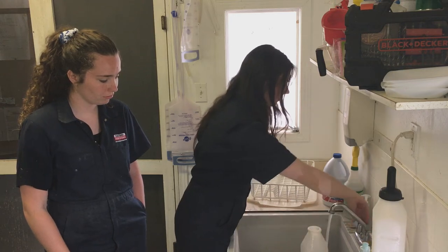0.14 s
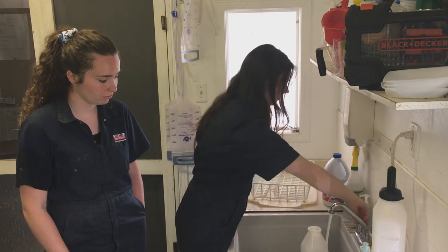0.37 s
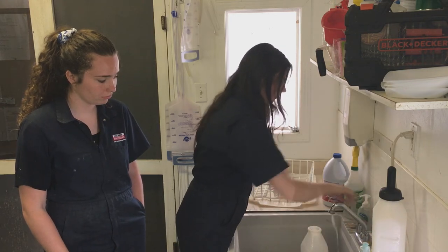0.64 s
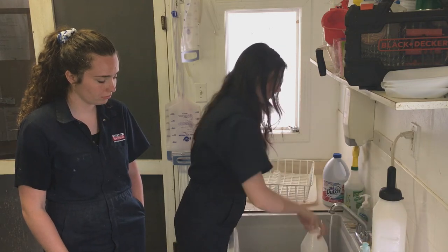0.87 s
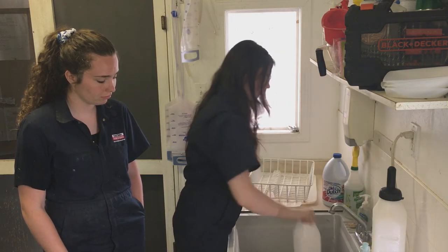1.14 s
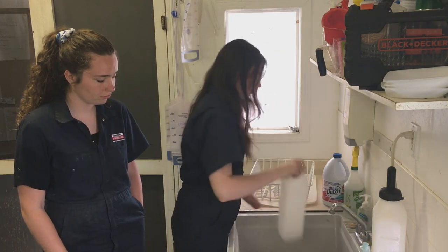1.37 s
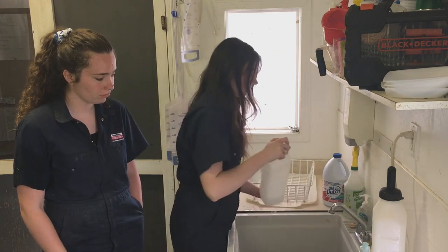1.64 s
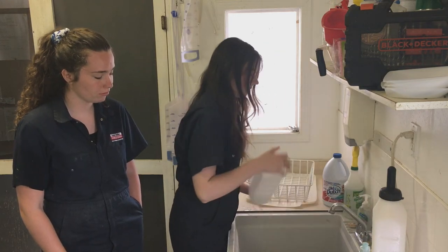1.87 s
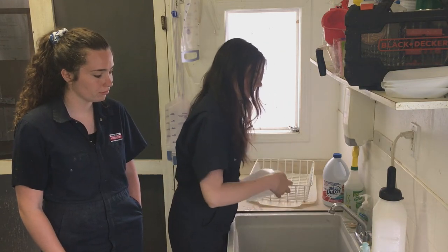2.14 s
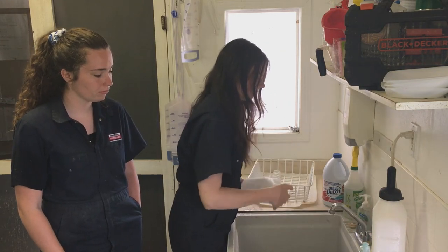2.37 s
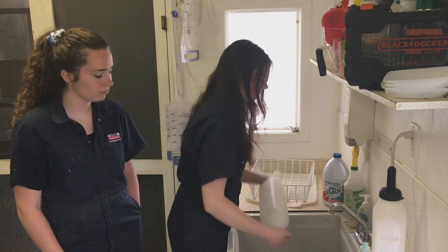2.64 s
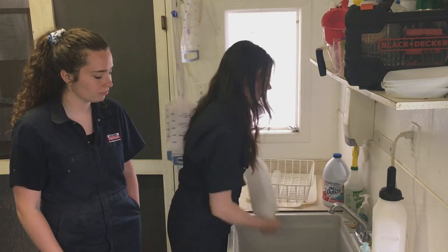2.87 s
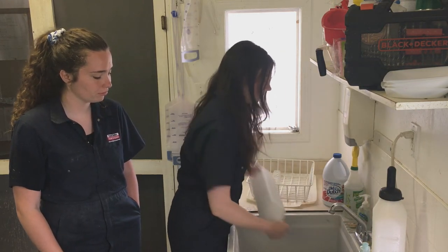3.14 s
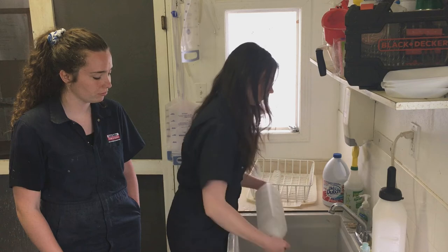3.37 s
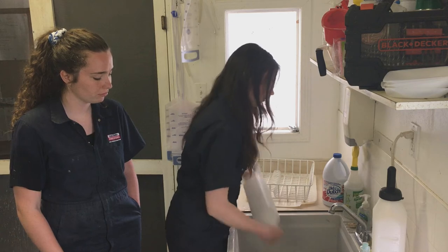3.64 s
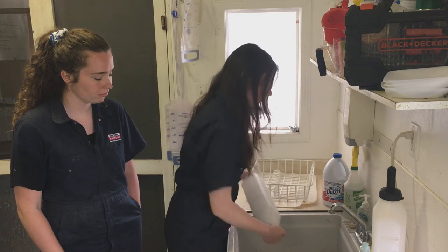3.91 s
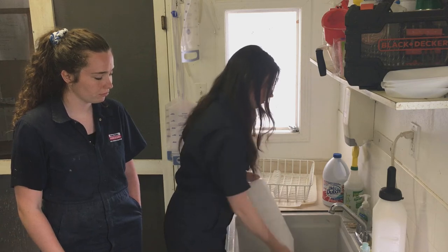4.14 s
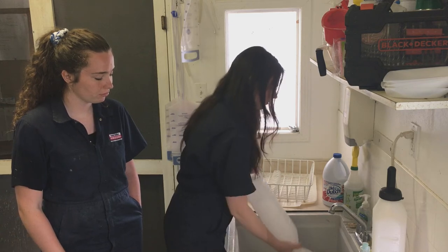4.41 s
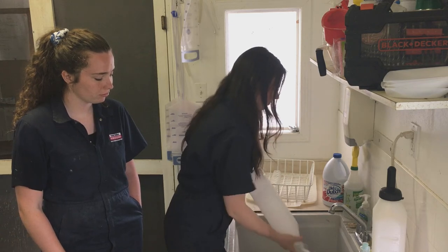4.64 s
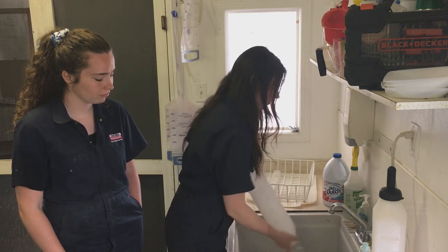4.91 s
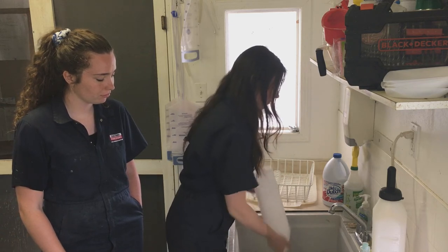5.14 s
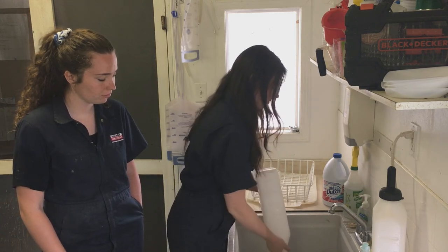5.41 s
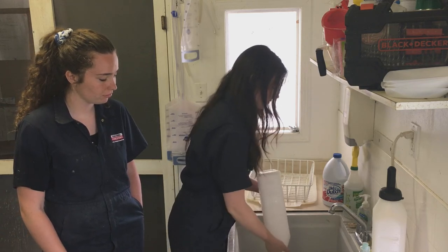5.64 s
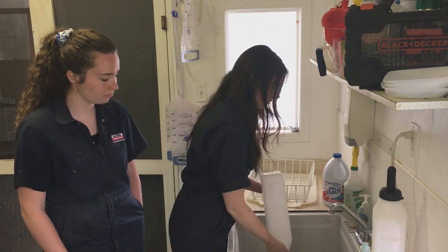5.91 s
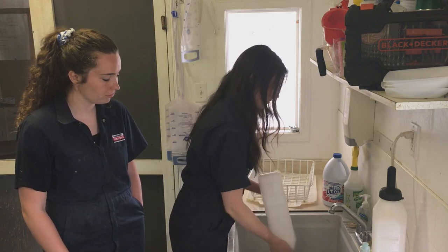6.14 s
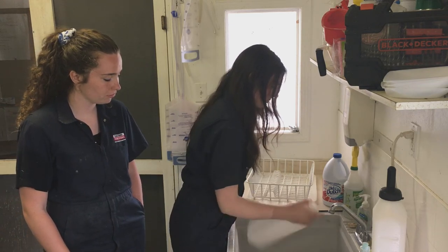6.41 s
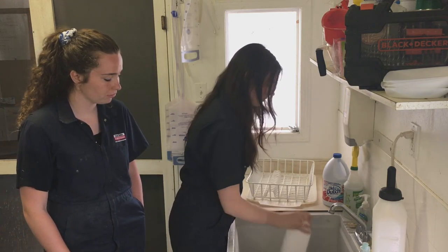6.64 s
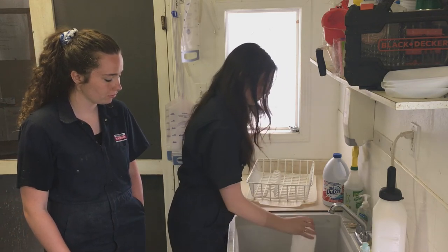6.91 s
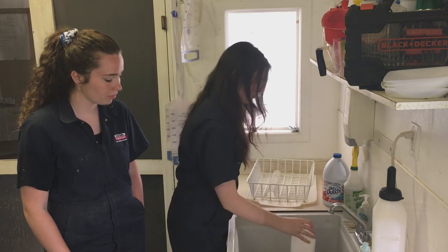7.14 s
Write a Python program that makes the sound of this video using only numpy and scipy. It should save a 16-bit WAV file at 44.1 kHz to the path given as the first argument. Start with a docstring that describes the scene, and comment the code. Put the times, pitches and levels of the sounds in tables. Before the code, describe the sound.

A small, hard, briefly reverberant utility room with a low, steady hum of distant machines; the microphone is close. From 0 s a tap jet hisses into a plastic bottle, whose air hums. Between 0.3 and 0.55 s the closing valve gives thin, very high whistles, and the flow dies by about 0.85 s. Bright drops, small ticks, dull bumps and slosh follow around 1 to 1.5 s, then near quiet with a faint slosh at 2.05 s. At 2.75 s water gurgles from the upended bottle, shaken in quick surges from 2.9 to 3.9 s. A heavy slap lands at 4.0 s; freer gushing with deep glugs drums on the basin until a sharp splash at 4.93 s. Drips and ticks thin out from 5.1 to 6.35 s. A bright, loud, rattling hollow knock hits at 6.39 s, a duller one at 6.78 s, and a soft one at 7.05 s.

```python
"""A tap hisses into a humming plastic bottle at a utility sink in a small hard room; its valve whistles shut.
The bottle is lifted, upended and shaken empty: water spatters, gurgles and drums on the basin.
Last drops fall, then the bottle knocks three times on the basin.
Water is shaped noise with wandering resonances, drops and bubbles are rung bursts,
knocks ring basin modes; feedback delays make the room."""
import sys
import numpy as np
from scipy import signal
from scipy.fft import rfft, irfft, next_fast_len
from scipy.io import wavfile

SR = 44100
rng = np.random.default_rng(int(sys.argv[2]) if len(sys.argv) > 2 else 0)


def transcribe(u):
    """Save the signal u as a 16-bit wav file named by the first command-line argument.

    u: samples, shape (n,) or (channels, n), limited to [-1, 1]; the rate is SR.
    q: integer samples, one column per channel.
    """
    v = np.clip(np.atleast_2d(u).T, -1, 1)
    q = np.round(v * 32767).astype(np.int16)
    wavfile.write(sys.argv[1], SR, q)


def ratio_of_db(decibels):
    """Turn decibels (scalar or array-like) into linear amplitude factors; 0 dB maps to 1."""
    return 10 ** (np.asarray(decibels, float) / 20)


N = 321048
TIME = np.arange(N) / SR


def rms_one(x):
    """Scale to unit rms."""
    return x / np.sqrt(np.mean(x ** 2) + 1e-20)


def in_time(rows):
    """Columns of a curve table, one value per sample."""
    s, *columns = np.transpose(rows)
    return [np.interp(TIME, s, column) for column in columns]


def lasting(rows):
    """Gate: one while a curve table lasts, zero outside."""
    return (TIME >= rows[0][0]) & (TIME <= rows[-1][0])


def at_hz(points, hz):
    """Read a spectrum table on a log frequency axis."""
    table_hz, values = np.array(points).T
    return np.interp(np.log(hz), np.log(table_hz), values)


def filtered(x, order, edge_hz, kind):
    """Butterworth filter."""
    return signal.sosfilt(signal.butter(order, edge_hz, kind, fs=SR, output="sos"), x)


def drift(pole_hz):
    """Slow random curve of spread 1: noise at SR / 20 through two equal poles, interpolated."""
    r = np.exp(-2 * np.pi * pole_hz * 20 / SR)
    settle = 3000
    noise = rng.standard_normal(N // 20 + settle + 2)
    slow = signal.lfilter([1], [1, -2 * r, r * r], noise)[settle:]
    return np.interp(np.arange(N) / 20, np.arange(len(slow)), rms_one(slow))


def narrow_noise(hz, pole_hz):
    """Resonance fed by turbulence: carrier of wandering height and phase, rms about 1."""
    phase = np.cumsum(2 * np.pi * hz / SR * np.ones(N))
    return drift(pole_hz) * np.cos(phase) + drift(pole_hz) * np.sin(phase)


def ring(clicks, hz, t60_s):
    """Two-pole resonator: a unit click starts a decaying sine of height 1."""
    r = ratio_of_db(-60 / (t60_s * SR))
    w = 2 * np.pi * hz / SR
    return signal.lfilter([0, np.sin(w)], [1, -2 * r * np.cos(w), r * r], clicks + 1e-18)


def dying(s, t60_s):
    """Envelope that starts at s and falls 60 dB in t60_s."""
    return (TIME >= s) * ratio_of_db(-60 * np.maximum(TIME - s, 0) / t60_s)


def rising(s, rise_ms):
    """Envelope that climbs to one from s, time constant rise_ms."""
    return 1 - np.exp(-1000 * np.maximum(TIME - s, 0) / rise_ms)


def bands(spectrum, sources):
    """Yield 0.4-octave bands (centre Hz, signal) at spectrum level; neighbours take unrelated sources."""
    edges = 24 * 2 ** np.arange(0, 9.7, 0.4)
    for k, (low, high) in enumerate(zip(edges, edges[1:])):
        hz = np.sqrt(low * high)
        if hz > spectrum[0][0]:
            yield hz, ratio_of_db(at_hz(spectrum, hz)) * filtered(sources[k % 2], 2, [low, high], "band")


def droplets(per_s, spread_db, smooth):
    """Two streams of random impacts of uneven size on a smooth hiss."""
    sizes = ratio_of_db(spread_db * np.minimum(rng.exponential(1, (2, N)), 5))
    sizes *= rng.choice([-1, 1], (2, N))
    born = rng.random((2, N)) < per_s / SR
    return rms_one(sizes * born) + smooth * rng.standard_normal((2, N))


def swells(rows, rise_ms, t60_s):
    """Low resonances swell, ring, and are stilled as bottle, hand or water closes on them."""
    stilled_t60_s = 0.0063
    out = np.zeros(N)
    for s, db, hz, free_ms in rows:
        since = np.maximum(TIME - s, 0)
        stilled = ratio_of_db(-60 * np.maximum(since - free_ms / 1000, 0) / stilled_t60_s)
        envelope = rising(s, rise_ms) * dying(s, t60_s) * stilled
        out += ratio_of_db(db) * envelope * np.sin(2 * np.pi * hz * since)
    return out


# tap jet, shut in two turns: t/s, hiss level/dB, air column level/dB
TAP_JET = [(0.0, -36, -32), (0.4, -36.5, -37), (0.45, -42.5, -37), (0.49, -41, -55), (0.64, -47, -70),
           (0.665, -38.5, -74.5), (0.72, -46, -75), (0.79, -56.5, -82), (0.86, -63, -78)]
# jet hiss spectrum: f/Hz, level per Hz/dB
TAP_SPECTRUM = [(180, -50), (300, -17), (342, -5), (411, -31), (756, -8), (922, -20.5), (1490, -8.5),
                (1700, -11), (4210, -7), (4880, -11), (5950, -6.5), (8420, -7.5), (15500, -19)]
# modes of the air in the filling bottle: f/Hz, drift pole/Hz, level/dB
AIR_COLUMN_MODES = [(1440, 133, -3), (3030, 77, -20.5), (5200, 320, -8)]


def tap_jet():
    """Jet hisses as flickering droplet noise; bottle air hums and the bottle floor drums with it."""
    sag_per_s = 0.12   # the hum sinks with the jet
    rumble_db, rumble_hz, rumble_pole_hz = -19, 150, 30.3
    hiss_db, column_db = in_time(TAP_JET)
    hiss = sum(ratio_of_db(1.9 * drift(9)) * band for _, band in bands(TAP_SPECTRUM, droplets(4000, 2.9, 0.59)))
    column = sum(ratio_of_db(db) * narrow_noise(hz * (1 - sag_per_s * TIME), pole_hz)
                 for hz, pole_hz, db in AIR_COLUMN_MODES)
    rumble = ratio_of_db(rumble_db) * narrow_noise(rumble_hz, rumble_pole_hz)
    return lasting(TAP_JET) * (ratio_of_db(hiss_db) * rms_one(hiss) + ratio_of_db(column_db) * (column + rumble))


# background spectrum: f/Hz, level per Hz/dB
AIR_SPECTRUM = [(15, -61), (25, -20), (37, -25.5), (80, 0), (144, -5.5), (241, -7.5), (324, -15),
                (382, -12), (572, -10.5), (1220, -14.5), (1430, -25.5), (2150, -23), (3130, -30.5),
                (5520, -31), (15800, -37)]
# background left-right likeness: f/Hz, likeness (0-1)
AIR_STEREO = [(60, 1), (240, 0.93), (950, 0.86), (3770, 0.88), (15000, 0.91)]


def air():
    """Distant machines and traffic hum through the walls: stereo noise flickering band by band."""
    level_db = -53.5   # left channel, 300-1300 Hz
    out = 0
    for hz, (mid, side) in bands(AIR_SPECTRUM, rng.standard_normal((2, 2, N))):
        alike = np.clip(at_hz(AIR_STEREO, hz), 0, 1)
        flicker = ratio_of_db(3.24 * min(1, 500 / hz) * drift(11.0))
        stereo = np.sqrt(1 + alike) * mid + np.sqrt(1 - alike) * side * [[1], [-1]]
        out = out + flicker * stereo
    return ratio_of_db(level_db) * out / np.std(filtered(out[0], 4, [300, 1300], "band"))


# reverberation: f/Hz, t60/s
ROOM_DECAY = [(100, 0.38), (1000, 0.28), (5000, 0.4), (15000, 0.33)]
# echoes to the sides: f/Hz, level/dB
ROOM_SIDE_LEVEL = [(100, -24), (300, -9), (1000, -7.5), (5000, -10), (14000, -10.5)]


def room(x):
    """Feedback delays with frequency-dependent loss; one set in the middle, another to the sides."""
    middle_db = -4.5
    size = next_fast_len(N + SR)
    hz = np.maximum(np.arange(size // 2 + 1) * SR / size, 1)
    t60_s = at_hz(ROOM_DECAY, hz)
    spectrum = rfft(x, size)
    out = []
    lags_s = rng.uniform(0.009, 0.05, (2, 16))
    for lags, db in zip(lags_s, [middle_db, at_hz(ROOM_SIDE_LEVEL, hz)]):
        loops = [ratio_of_db(-60 * lag / t60_s) * np.exp(-2j * np.pi * hz * lag) for lag in lags]
        echo = sum((-1) ** k * loop / (1 - loop) for k, loop in enumerate(loops))
        echo = echo / np.sqrt(np.mean(np.abs(echo) ** 2))
        out.append(irfft(ratio_of_db(db) * spectrum * echo, size)[:N])
    middle, side = out
    return middle + side * [[1], [-1]]


# glides of the closing valve: start t/s, end t/s, start f/Hz, end f/Hz, level/dB
VALVE_WHISTLES = [(0.302, .358, 10000, 9960, -49.5), (0.303, 0.341, 12300, 12830, -34),
                  (.318, .342, 6340, 6480, -42), (0.348, 0.42, 11300, 11920, -31),
                  (.418, .5, 11800, 12150, -33), (0.416, 0.446, 12540, 12620, -18),
                  (.42, .488, 8715, 8740, -38), (.455, 0.464, 12550, 12630, -18),
                  (0.476, 0.482, 12640, 12640, -18), (0.488, 0.542, 12300, 12420, -36),
                  (.495, .56, 12700, 12700, -43), (.56, 0.674, 12500, 12620, -62)]


def whistles():
    """Closing valve whistles: gliding sines, randomly wavering in height and phase."""
    waver, waver_pole_hz = 0.3, 61
    rise_ms, t60_s = 3.3, 0.03
    wander = drift(waver_pole_hz) + 1j * drift(waver_pole_hz)
    out = np.zeros(N)
    for start, end, from_hz, to_hz, db in VALVE_WHISTLES:
        hz = np.interp(TIME, [start, end], [from_hz, to_hz])
        carrier = np.exp(1j * np.cumsum(2 * np.pi * hz / SR))
        held = rising(start, rise_ms) * np.where(TIME < end, 1, dying(end, t60_s))
        out += ratio_of_db(db) * held * np.imag(carrier * (np.sqrt(2) + waver * wander))
    return out


# single drops: t/s, peak level/dB, f/Hz, burst decay constant/ms
SINGLE_DROPS = [(0.521, -26, 3560, 3.2), (0.567, -22, 6000, 2.6), (0.988, -33, 4000, 5),
                (1.027, -25.5, 5960, 11), (1.065, -29, 10800, 5), (1.089, -15.5, 6960, 6.2),
                (1.09, -26.5, 3160, 10), (1.188, -23, 11400, 4), (1.3533, -28, 4080, 4),
                (1.445, -32.5, 10900, 5.6), (5.145, -29.5, 3000, 4.3), (5.201, -29.5, 2360, 21),
                (5.224, -32, 4420, 7), (5.419, -26.5, 8600, 5.5), (5.549, -37, 11100, 4),
                (5.694, -22, 3000, 12), (5.695, -24, 3900, 11), (5.7467, -30, 10500, 3.3),
                (5.838, -32, 7100, 4), (5.952, -37.5, 8740, 3.3), (6.055, -35.5, 6640, 5.8),
                (6.141, -32, 8800, 5.4), (6.267, -35, 6700, 6.8), (6.35, -33.5, 7000, 5.4)]


def drops():
    """Each drop's noise burst rings a bubble at its pitch and throws a brighter splash."""
    splash_share = 0.41
    length = 1500
    t = np.arange(length) / SR
    out = np.zeros(N)
    for s, db, hz, decay_ms in SINGLE_DROPS:
        burst = rng.standard_normal(length) * np.exp(-1000 * t / decay_ms)
        plink = ring(burst, hz, 16 / hz)
        splash = filtered(burst, 2, [hz, min(1.68 * hz, 17000)], "band")
        drop = rms_one(plink) + splash_share * rms_one(splash)
        drop = filtered(drop, 3, 0.75 * hz, "high")
        out[round(s * SR):][:length] += ratio_of_db(db) * drop / np.abs(drop).max()
    return out


# dry ticks: t/s, peak level/dB, lower edge f/Hz, upper edge f/Hz
DRY_TICKS = [(0.7204, -20, 100, 2580), (0.814, -23, 300, 8950), (0.907, -29.5, 1500, 10000),
             (1.139, -17, 9000, 16000), (1.231, -27, 7000, 16100), (1.858, -33.5, 2000, 15900),
             (1.881, -33, 7000, 13900), (5.132, -26, 7050, 15700), (5.248, -18.5, 497, 6840),
             (5.342, -18, 300, 8140), (5.459, -20.5, 1500, 9900), (6.41, -9.5, 3300, 9020),
             (6.805, -20, 3000, 11860), (6.828, -14.5, 1000, 11900), (7.246, -31, 603, 7460)]


def ticks():
    """Single band-limited clicks without echo."""
    length = 200
    out = np.zeros(N)
    for s, db, low_hz, high_hz in DRY_TICKS:
        b, a = signal.butter(2, [low_hz, high_hz], "band", fs=SR)
        pulse = signal.lfilter(b, a, np.eye(1, length)[0])
        out[round(s * SR):][:length] -= ratio_of_db(db) * pulse / pulse.max()
    return out


# dull bumps of pipe, bottle and basin: t/s, level/dB, f/Hz, stilled after/ms
HANDLING_BUMPS = [(.722, -36, 69.6, 200), (.965, -30.5, 150, 74), (1.082, -33, 397, 60),
                  (1.13, -38.5, 173, 55), (1.68, -37.5, 138, 52), (5.7, -29, 165.5, 90)]


def bumps():
    """Handling bumps: low resonances, soon stilled."""
    return swells(HANDLING_BUMPS, rise_ms=8, t60_s=0.2)


# surges thrown by shaking: crest t/s, level above the stream/dB
SHAKE_SURGES = [(2.931, 5.5), (3.162, 2.5), (3.345, 5.5), (3.535, 7), (3.73, 6), (3.915, 3)]


def surge_db():
    """Each shake lifts the stream level in a triangle (dB)."""
    rise_s, fall_s = 0.073, 0.044
    return sum(np.interp(TIME, [s - rise_s, s, s + fall_s], [0, db, 0]) for s, db in SHAKE_SURGES)


# slugs of water hitting the basin: t/s, level/dB, rise/ms, t60/s, tilt/(dB per octave)
WATER_SLAPS = [(3.141, -38, 8, 0.18, -6.5), (4.017, -15, 7.4, 0.18, -1.5), (4.149, -32, 4, 0.09, -6.5),
               (4.843, -41, 1.5, 0.093, 4), (4.9306, -16, 3.2, 0.043, 2), (4.99, -35, 1.5, 0.033, -1)]


def slap_envelopes():
    """Each slug of water rises fast and dies exponentially."""
    return [ratio_of_db(db) * dying(s, t60_s) * rising(s, rise_ms) for s, db, rise_ms, t60_s, _ in WATER_SLAPS]


# water in the lifted and carried bottle: t/s, level/dB, tilt/(dB per octave)
BOTTLE_SLOSH = [(0.86, -69, 8), (0.96, -47.5, 2), (1.03, -46, 1.5), (1.12, -48, 6.5), (1.3, -59, 4.5),
                (1.5, -61.5, 4.5), (1.8, -84.5, 12.5), (1.95, -75, 11), (2.06, -59.5, 3),
                (2.25, -76, -10.5)]
# stream from the upended bottle: t/s, level/dB, freeness (0 = shaken through a choked neck, 1 = gushing)
STREAM = [(2.68, -73.5, 0.26), (2.8, -39.5, 0.032), (3.0, -40.5, 0), (3.95, -39, 0), (4.14, -37.5, 0),
          (4.26, -46.5, 0.15), (4.34, -32.5, 0.37), (4.56, -32.5, 0.75), (4.61, -26, 0.73),
          (4.76, -36, 0.76), (4.83, -45.5, 1.1), (4.86, -36, 0.77), (4.92, -36, 1), (4.99, -34, .8),
          (5.1, -49.5, 0.73), (5.2, -59, 2.13), (5.8, -60, 1.62), (6.34, -75.5, 1.7)]
# spatter spectrum: f/Hz, level per Hz/dB
SPATTER_SPECTRUM = [(260, -42), (450, -10), (522, -4.5), (866, -9), (1020, -5.5), (1260, -9.5), (1640, -2),
                    (1800, -3.5), (3670, -4), (4260, -4), (10900, -13.5), (14200, -21), (15800, -37)]


def spatter():
    """Lumpy droplet noise plays slosh, stream and slaps, each with its own level and spectral tilt."""
    choked_tilt_db, free_tilt_db = -2, 3   # per octave
    slosh_db, slosh_tilt_db = in_time(BOTTLE_SLOSH)
    flow_db, free = in_time(STREAM)
    stream_db = flow_db + surge_db()
    stream_tilt_db = choked_tilt_db + (free_tilt_db - choked_tilt_db) * free
    slaps = slap_envelopes()
    lumps = drift(17.0)   # common to all bands
    plain, out = 0, 0
    for hz, band in bands(SPATTER_SPECTRUM, droplets(3000, 2.33, 1.0)):
        band = band * ratio_of_db(1.74 * lumps + 2.45 * drift(45))
        octaves = np.log2(max(hz, 1200) / 3500)
        gain = lasting(STREAM) * ratio_of_db(stream_db + stream_tilt_db * octaves)
        gain += lasting(BOTTLE_SLOSH) * ratio_of_db(slosh_db + slosh_tilt_db * octaves)
        gain += sum(ratio_of_db(row[4] * octaves) * slap for row, slap in zip(WATER_SLAPS, slaps))
        plain = plain + band
        out = out + gain * band
    return out / np.std(plain)


def neck_gurgle():
    """Neck resonance gurgles under stream and slaps, climbing as the bottle empties."""
    hz, pole_hz, climb_hz_per_s = 546.6, 53, 25
    choked_db, free_db, slap_db, surge_share = -8, -35, -11.5, 0.79
    flow_db, free = in_time(STREAM)
    level_db = flow_db + surge_share * surge_db() + choked_db + (free_db - choked_db) * free
    level = ratio_of_db(level_db + 1.9 * drift(22)) + ratio_of_db(slap_db) * sum(slap_envelopes())
    climbing_hz = hz + climb_hz_per_s * (TIME - STREAM[1][0])
    return lasting(STREAM) * level * narrow_noise(climbing_hz, pole_hz)


def basin_drumming():
    """Basin floor drums in two resonances and rumbles in a low noise band under the stream."""
    drum_hz, overtone_hz, pole_hz = 172, 367.6, 49
    choked_db, free_db, rumble_db = -17, -5.5, -19.5
    flow_db, free = in_time(STREAM)
    drum = narrow_noise(drum_hz, pole_hz) + 0.5 * narrow_noise(overtone_hz, pole_hz)
    drum_db = flow_db + surge_db() + choked_db + (free_db - choked_db) * free
    rumble = rms_one(filtered(rng.standard_normal(N), 2, [70, 258], "band"))
    return lasting(STREAM) * (ratio_of_db(drum_db + 1.8 * drift(3)) * drum + ratio_of_db(flow_db + rumble_db) * rumble)


def bubbles():
    """Air dragged under the stream: random bubbles ring a few cycles, from gurgle to fizz."""
    per_s, level_db, t60_cycles = 160, -15, 12.8
    flow_db, _ = in_time(STREAM)
    born = rng.random(N) < per_s / SR
    sizes = ratio_of_db(4.7 * np.minimum(rng.exponential(1, N), 4)) * born
    pitches_hz = np.geomspace(450, 3400, 9)
    dealt = rng.integers(0, 9, N)
    rung = sum(ring(sizes * (dealt == k), hz, t60_cycles / hz) for k, hz in enumerate(pitches_hz))
    return lasting(STREAM) * ratio_of_db(flow_db + surge_db() + level_db) * rms_one(rung)


# gulps of air entering the upended bottle: t/s, level/dB, f/Hz, stilled after/ms
AIR_GULPS = [(3.705, -33, 191, 58), (4.018, -25.5, 186, 33), (4.09, -28, 132, 87), (4.27, -35, 178, 39),
             (4.33, -20.5, 178, 46), (4.382, -27.5, 179, 29), (4.445, -30, 172, 30),
             (4.495, -23.5, 176, 120), (4.55, -28, 184, 27), (4.648, -22.5, 172, 45), (4.74, -24, 176, 32),
             (4.925, -26, 149, 48), (4.985, -31, 178, 30)]


def glugs():
    """Each gulp of air swells a low bottle resonance."""
    return swells(AIR_GULPS, rise_ms=7.1, t60_s=0.31)


# basin modes: f/Hz, level/dB, t60/s
BASIN_MODES = [(132, -18.5, 0.51), (178, -20.5, 0.332), (224.3, -15, 0.26), (250, -11.5, 0.16),
               (340.5, -19.5, 0.2), (366.4, -25, 0.14), (392, -18.5, 0.19), (468, -19, 0.2),
               (474, -35, 0.19), (554, -26.5, 0.48), (715, -26, 0.16), (762, -27.5, 0.25),
               (755, -21.5, 0.26), (840, -21, .25), (904, -34, 0.29), (1079, -38.5, 0.52)]
# rattle spectrum: f/Hz, level per Hz/dB
RATTLE_SPECTRUM = [(180, -70), (300, -9.5), (654, -8.5), (772, -7), (990, -16), (1680, -17), (3490, -32),
                   (5030, -36), (6780, -42), (15800, -66)]
# rattle decay: f/Hz, t60/s
RATTLE_DECAY = [(300, 0.494), (1500, 0.38), (5000, 0.31), (15000, 0.42)]
# bottle on basin: t/s, blow level/dB, contact/ms, rattle level/dB, bottle boom f/Hz
BOTTLE_KNOCKS = [(6.391, -2.5, 0.073, 8.5, 172), (6.784, -4, 0.39, 0, 184.9),
                 (7.048, -18, 0.39, -23.5, 195)]


def knocks():
    """Blow and chatter, low-passed by soft contact, ring basin modes; a rattle dies band by band."""
    blows = np.zeros(N)
    chatter = rng.standard_normal(N)
    for s, db, contact_ms, _, _ in BOTTLE_KNOCKS:
        force = ratio_of_db(db - 23.5) * chatter * dying(s, 0.14)
        force[round(s * SR)] = ratio_of_db(db)
        blows += filtered(force + 1e-18, 2, 170 / contact_ms, "low")
    out = sum(ratio_of_db(db) * ring(blows, hz, t60_s) for hz, db, t60_s in BASIN_MODES)
    for hz, band in bands(RATTLE_SPECTRUM, rng.standard_normal((2, N))):
        for s, _, contact_ms, rattle_db, _ in BOTTLE_KNOCKS:
            dull = 1 / np.sqrt(1 + (hz * contact_ms / 900) ** 2.2)
            crack = 3.1 * dying(s, 0.025)
            decay = dying(s, at_hz(RATTLE_DECAY, hz)) + crack
            out += ratio_of_db(rattle_db) * dull * band * rising(s, 2.7 * contact_ms) * decay
    # basin too small to radiate deep bass
    return filtered(out, 4, 69, "high")


def booms():
    """Each knock booms in the hollow bottle and slowly swells the basin floor."""
    boom_db, floor_db = 3, -7.5   # against the blow
    free_ms, free_ms_per_db = 56, 2.34   # a harder blow lifts the bottle off for longer
    floor_hz, floor_free_ms = 85.4, 95
    boom_rows = [(s, db + boom_db, hz, free_ms + free_ms_per_db * db) for s, db, _, _, hz in BOTTLE_KNOCKS]
    floor_rows = [(s, db + floor_db, floor_hz, floor_free_ms) for s, db, *_ in BOTTLE_KNOCKS]
    return swells(boom_rows, rise_ms=1.7, t60_s=0.33) + swells(floor_rows, rise_ms=50, t60_s=0.49)


def scene():
    """Water slightly left, blows central; each feeds the room at its own level; air and ticks stay dry."""
    stream = neck_gurgle() + basin_drumming() + bubbles()
    wet = tap_jet() + whistles() + spatter() + stream + glugs()
    drip = drops()
    hard = bumps() + knocks() + booms()
    pan = ratio_of_db(np.array([[0.4], [-0.4]]))
    sink = (ratio_of_db(1.5) * wet + ratio_of_db(-2.5) * drip) * pan + hard
    echoes = room(ratio_of_db(-4.0) * wet + ratio_of_db(-4.0) * drip + ratio_of_db(-7.5) * hard)
    return sink + echoes + air() + ticks()


def low_pass(x):
    """Removes everything above the highest recorded frequency."""
    return signal.sosfilt(signal.butter(12, 16350, fs=SR, output="sos"), x)


def record(dry):
    """Input overload: peaks clip at full scale."""
    mix = np.clip(dry, -1, 1)
    return low_pass(mix)


dry = scene()
out = record(dry)
transcribe(out)
```